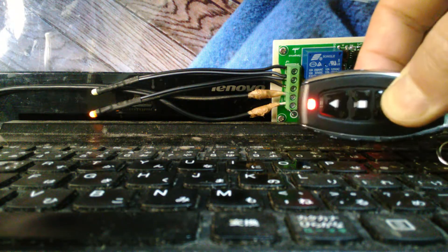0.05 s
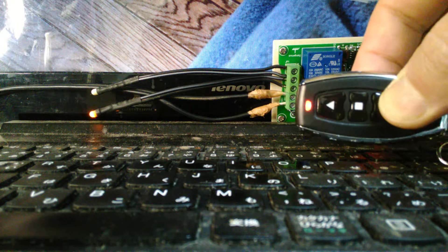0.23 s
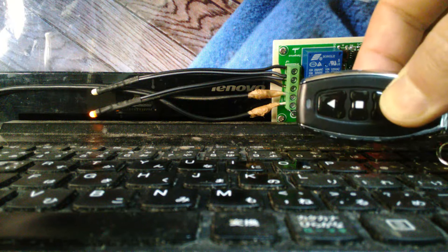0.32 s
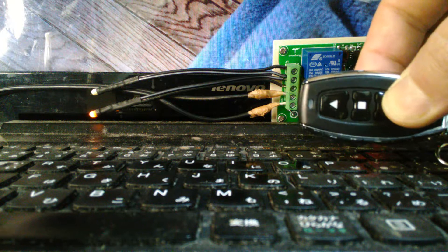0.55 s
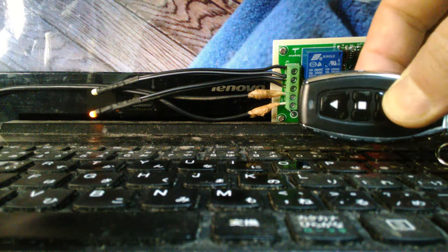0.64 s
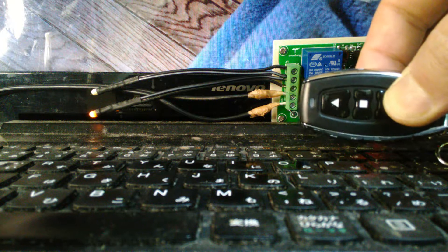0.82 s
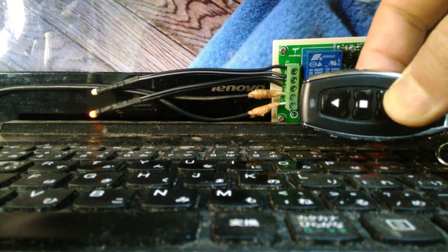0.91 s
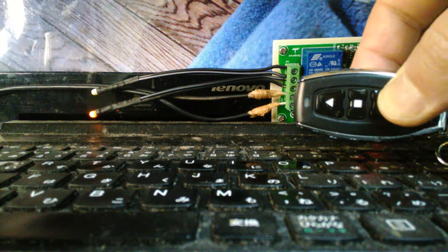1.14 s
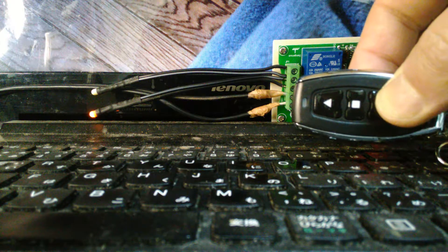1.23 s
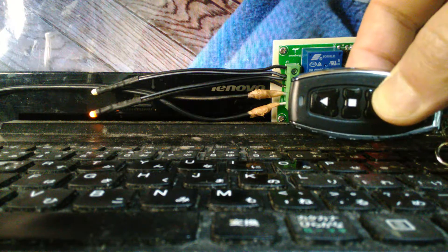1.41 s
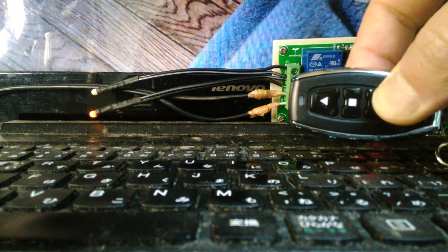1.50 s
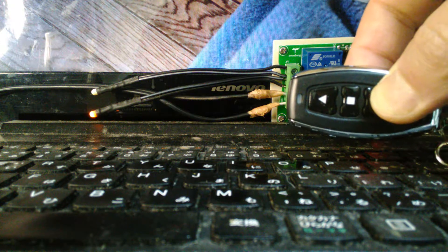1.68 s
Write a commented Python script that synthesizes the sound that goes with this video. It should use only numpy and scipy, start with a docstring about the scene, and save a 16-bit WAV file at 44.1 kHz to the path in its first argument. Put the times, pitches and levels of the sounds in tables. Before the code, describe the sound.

A small relay clicks twice close to the microphone. At about 0.1 seconds it pulls in with a sharp, bright metallic snap that dies away at once. At about 0.3 seconds it lets go with a much softer, duller plastic tock. Barely audible finger ticks on a remote surround the clicks. After that, only a quiet room's faint rumble, hum and hiss remain until about 1.7 seconds.

```python
"""A small relay on a circuit board, close to the microphone, is switched by a remote button.
Its moving iron arm pulls in with a bright metallic snap and lets go with a duller plastic tock.
Each blow rings a few short tones, rattles the case and dies away in a small quiet room.
Behind it are faint finger sounds on the remote, low rumble, mains hum, hiss and a thin whine."""
import sys
import numpy as np
from scipy import signal
from scipy.fft import rfft, irfft
from scipy.io import wavfile

SR = 44100
rng = np.random.default_rng(int(sys.argv[2]) if len(sys.argv) > 2 else 0)


def master(y):
    """Save y as 16-bit WAV."""
    cut = np.clip(np.atleast_2d(y).T, -1, 1)
    pcm = np.round(cut * 32767)  # scale
    wavfile.write(sys.argv[1], SR, pcm.astype(np.int16))


N = 77175

# The tone colour of each background noise. Each row: frequency in Hz, relative level in dB.
RUMBLE_COLOUR = [(12, -11), (25, -7), (35, 0), (50, -6.5), (75, -17.5), (150, -38), (400, -70.5)]
ROOM_TONE_COLOUR = [(30, -4), (75, -1.5), (115, 4.5), (150, -5.5), (260, -2), (400, -8.5), (600, -15.5),
                    (1000, -19), (2000, -27), (5000, -34.5), (8000, -42.5), (16000, -57.5)]
HISS_COLOUR = [(500, -3.5), (2000, -7.5), (4500, -8.5), (6000, -6), (8000, 1), (11000, -1), (13500, -0.5),
               (15600, 1), (16100, -30.5)]
# How the rumble swells and the hiss sinks. Each row: time in seconds, level in dB.
RUMBLE_LEVELS = [(0, -58), (.15, -59), (.29, -50), (.55, -60), (.69, -59.5), (.8, -67), (.94, -64),
                 (1.17, -57.5), (1.35, -59.5), (1.46, -57), (1.75, -59)]
HISS_LEVELS = [(0, -72), (.2, -73), (.42, -73), (.58, -77), (.8, -77), (1.05, -76.5), (1.2, -79),
               (1.75, -78.5)]

# Faint ticks of the remote in the fingers. Each row: start in seconds, level in dB.
FINGER_TICKS = [(.006, -59), (.034, -57), (0.498, -66.5), (0.63, -66)]
# The tone colour of the ticks and a squeak. Each row: frequency in Hz, relative level in dB.
FINGER_TICK_COLOUR = [(1000, -11.5), (4000, -26), (6800, -3), (8500, -6.5), (12000, -22), (16000, -27)]
FINGER_SQUEAK_COLOUR = [(4000, -30), (4480, 2), (4630, 0), (4800, -8), (5300, -36.5)]

# The room's echo of each click, and its late tail. Each row: frequency in Hz, relative level in dB.
SNAP_ECHO_COLOUR = [(200, -16), (400, 3.5), (700, -18.5), (1400, -19.5), (3000, -24), (5800, -22.5),
                    (7100, 0.5), (8100, -16), (8900, -2.5), (10300, -19.5), (11500, -12), (13000, -22),
                    (16000, -26.5)]
TOCK_ECHO_COLOUR = [(300, 5), (900, -6), (1600, -11), (2600, -4), (4000, -1), (5200, -9), (6900, 5),
                    (10000, -3), (16000, -30)]
TAIL_COLOUR = [(300, 2), (1500, 0), (3000, -5), (7000, -10.5), (16000, -20)]

# The strike and its bounces, pulling in and letting go. Each row: start in seconds, level in dB.
SNAP_BLOWS = [(.0947, 0), (.09827, -25), (.0997, -16)]
TOCK_BLOWS = [(0.319607, 0), (0.324317, -18)]
# The tones that ring. Each row: pitch in Hz, relative level in dB, seconds to fade by 60 dB.
ARM_AND_FRAME_TONES = [(2403, -21.5, 0.0044), (4185, -32, 0.017), (4860, -18, 0.007), (6750, -31, 0.0279),
                       (7172, 2.5, 0.0062), (7478, -1.5, 0.0057), (8730, -7, 0.0068), (9337, -21, 0.0181),
                       (9930, -24, 0.0153), (11600, -9.5, 0.0042), (12250, -24, 0.0147),
                       (13600, -25, 0.0097), (15638, -23, 0.0081)]
BOARD_TONES = [(397.0, -58.0, 0.14), (848.0, -50.0, 0.0487), (1401.0, -52.0, 0.0823),
               (2038.0, -49.0, 0.0489), (2290.0, -51.0, 0.0736), (6992.0, -42.0, 0.0746),
               (7182.0, -38.0, 0.0781), (7606.0, -42.0, 0.0609), (8589.0, -48.0, 0.1073), (8840, -48, 0.08),
               (8955.0, -43.0, 0.0852), (9291.0, -47.0, 0.0775)]
CASE_AND_SPRING_TONES = [(923, -49.5, 0.049), (1283, -24, 0.0046), (1550, -28, 0.017), (2196, -30, 0.0048),
                         (2780, -31, 0.0043), (3661, -46, 0.031), (4060, -47, 0.028), (6130, -39, 0.016),
                         (6780, -22, 0.0052), (7250, -30, 0.014), (7400, -52, 0.0046), (9430, -41, 0.013),
                         (10000, -29, 0.0047), (13499, -39, 0.0036)]
# The dense rattle of case and board. Each row: frequency in Hz, relative level in dB.
SNAP_RATTLE_COLOUR = [(200, -40), (800, -25), (2300, -21.5), (3200, -22.5), (4600, -18.5), (5800, -25.5),
                      (7100, -2.5), (8100, -15.5), (9100, 5.5), (10400, -17.5), (11700, -9.5), (13000, -21),
                      (15700, -18), (16500, -36.5)]
TOCK_RATTLE_COLOUR = [(300, -14), (600, -31), (850, -24), (1600, -1), (2300, -2), (4000, -12), (5000, -8),
                      (7000, 14), (9000, -5), (12000, -8), (16000, -4.5)]


def gain(db):
    """Turn decibels into a number to multiply a sound by."""
    return 10 ** (np.asarray(db) / 20)


def since(start):
    """Seconds since a moment, zero before it."""
    return np.maximum(np.arange(N) / SR - start, 0)


def noise(colour):
    """Noise with the given tone colour and an average strength (rms) of 1."""
    hz, db = np.array(colour).T
    frequencies = np.maximum(np.fft.rfftfreq(N, 1 / SR), 1)
    shape = gain(np.interp(np.log(frequencies), np.log(hz), db))
    coloured = irfft(rfft(rng.standard_normal(N)) * shape, N)
    return coloured / coloured.std()


def sine(hz):
    """A steady tone with an average strength (rms) of 1."""
    return np.sqrt(2) * np.sin(2 * np.pi * hz * since(0))


def level_curve(levels):
    """A volume that glides from one listed level to the next."""
    return gain(np.interp(since(0), *np.array(levels).T))


def fade(age, rise_s, fade_s):
    """A short smooth rise, and a fall of 60 dB every fade_s seconds."""
    rise = np.sin(np.pi / 2 * np.minimum(age / rise_s, 1)) ** 2
    return rise * np.exp(-np.log(1000) * age / fade_s)


def background():
    """Swelling rumble, steady room noise and mains hum; hiss and electronic whine sink together."""
    rumble = level_curve(RUMBLE_LEVELS) * noise(RUMBLE_COLOUR)
    room_tone = gain(-68.5) * noise(ROOM_TONE_COLOUR)
    hum = gain(-69.5) * sine(hz=99.8)
    whine = gain(-3.5) * sine(hz=7454)
    electronics = level_curve(HISS_LEVELS) * (noise(HISS_COLOUR) + whine)
    return rumble + room_tone + hum + electronics


def fingers_on_remote():
    """Fingers on the plastic remote make tiny ticks and one faint squeak."""
    pulses = sum(gain(db) * fade(since(start), rise_s=.0024, fade_s=.035) for start, db in FINGER_TICKS)
    ticks = noise(FINGER_TICK_COLOUR) * pulses
    squeak_at_s, squeak_width_s = 1.277, .013
    swell = np.exp(-((since(0) - squeak_at_s) / squeak_width_s) ** 2)
    return ticks + gain(-80) * noise(FINGER_SQUEAK_COLOUR) * swell


def room_echo(start, colour, db, fade_s):
    """Nearby reflections swell just after a click and leave a faint, duller tail."""
    age, rise_s = since(start), .008
    early = gain(db) * noise(colour) * fade(age, rise_s, fade_s)
    tail = gain(-63) * noise(TAIL_COLOUR) * fade(age, rise_s, fade_s=.24)
    return early + tail


def ring(start, tones, rise_s):
    """A struck part rings with several tones, each dying away at its own speed."""
    age = since(start)
    return sum(gain(db) * np.sin(2 * np.pi * hz * age) * fade(age, rise_s, fade_s)
               for hz, db, fade_s in tones)


def click(blows, tones, rise_s, rattle_colour, rattle_db, rattle_fade_s):
    """Every blow rings the same tones and sets the case rattling."""
    sound = np.zeros(N)
    for start, db in blows:
        rattle = gain(rattle_db) * noise(rattle_colour) * fade(since(start), rise_s, rattle_fade_s)
        sound += gain(db) * (ring(start, tones, rise_s) + rattle)
    return sound


def relay_release():
    """The relay lets go: its spring and plastic case ring with a dull tock that the room echoes."""
    start, rise_s = TOCK_BLOWS[0][0], .00041
    tock = click(TOCK_BLOWS, CASE_AND_SPRING_TONES, rise_s,
                 TOCK_RATTLE_COLOUR, rattle_db=-43, rattle_fade_s=.039)
    # The small case gives off little bass below 750 Hz.
    bass_cut = signal.butter(5, 750, "high", fs=SR, output="sos")
    return signal.sosfilt(bass_cut, tock) + room_echo(start, TOCK_ECHO_COLOUR, db=-57, fade_s=.08)


def relay_pull_in():
    """The arm snaps against the frame and bounces twice; the board rings on and the room echoes."""
    start, rise_s = SNAP_BLOWS[0][0], .00097
    snap = click(SNAP_BLOWS, ARM_AND_FRAME_TONES, rise_s,
                 SNAP_RATTLE_COLOUR, rattle_db=-29.5, rattle_fade_s=.03)
    board = ring(start, BOARD_TONES, rise_s)
    return snap + board + room_echo(start, SNAP_ECHO_COLOUR, db=-41, fade_s=.09)


def scene():
    """Room, hand and relay add up in one channel."""
    return (background() + fingers_on_remote() + relay_release() + relay_pull_in())[None]


def record(dry):
    """Cut away the very highest treble."""
    top_hz = 16500
    return signal.sosfilt(signal.ellip(8, .2, 70, top_hz, fs=SR, output="sos"), dry)


dry = scene()
out = record(dry)
master(out)
```